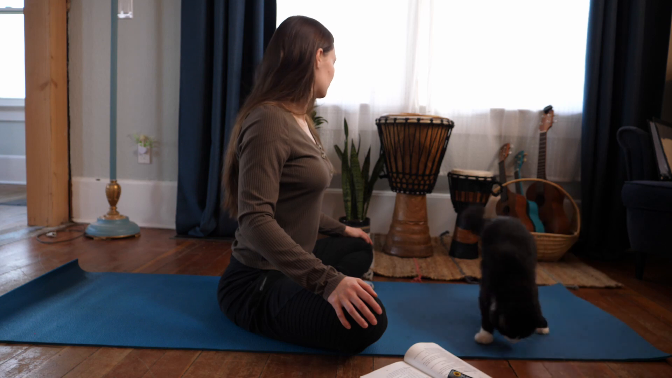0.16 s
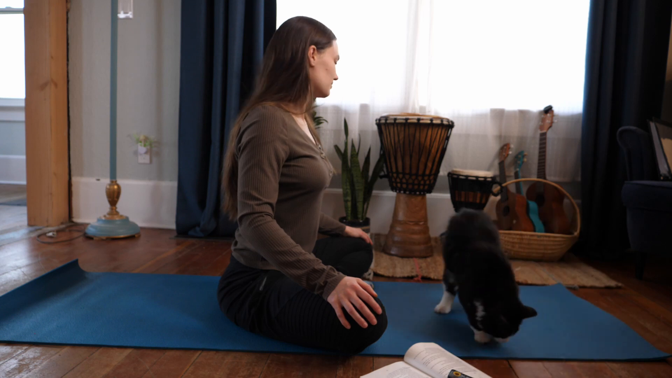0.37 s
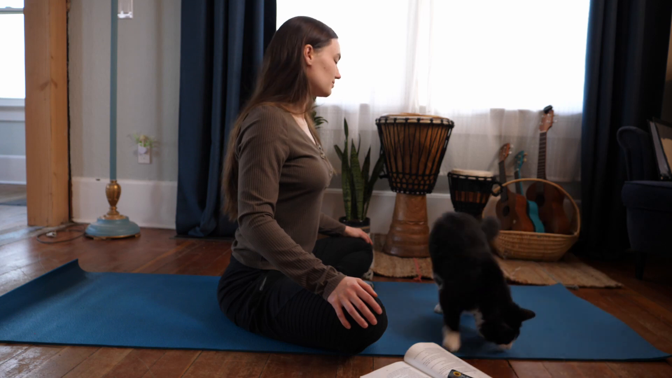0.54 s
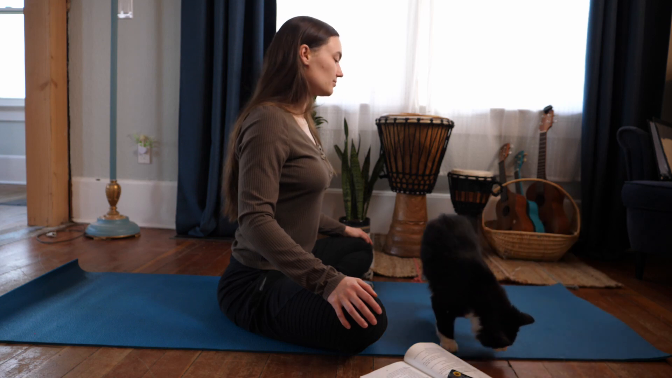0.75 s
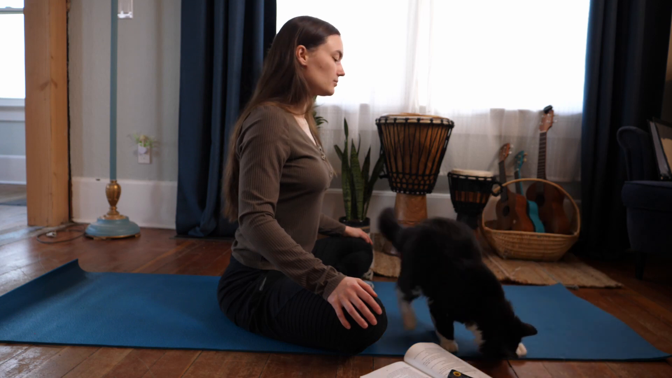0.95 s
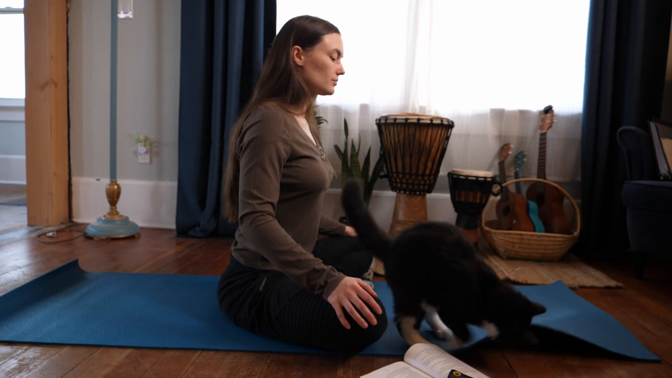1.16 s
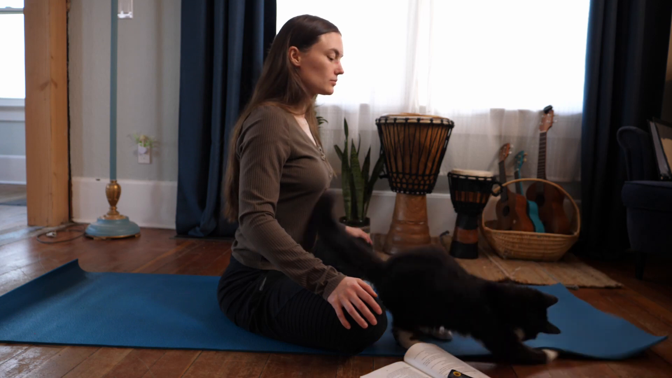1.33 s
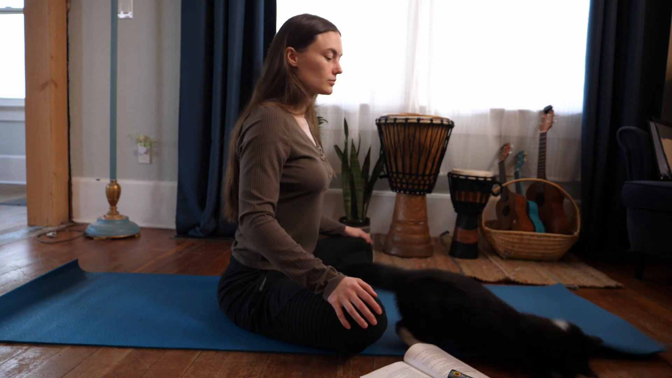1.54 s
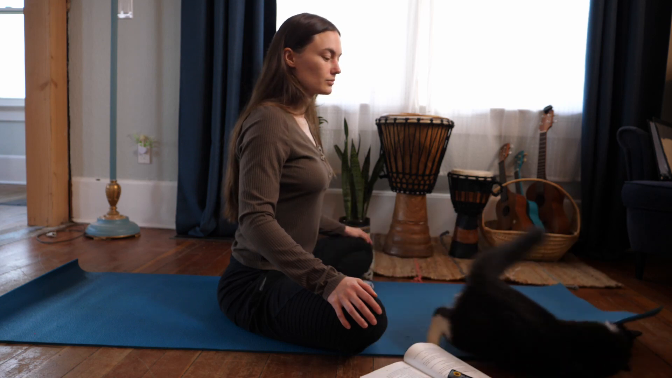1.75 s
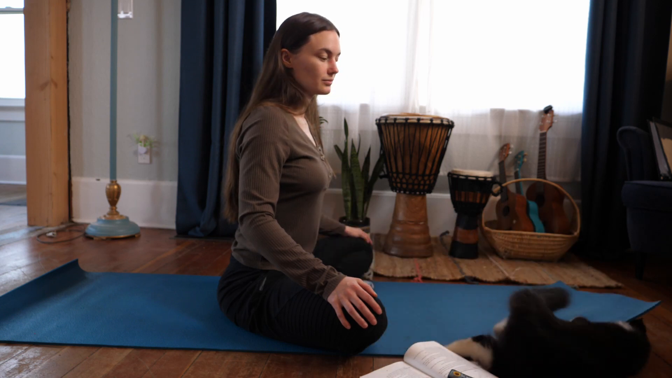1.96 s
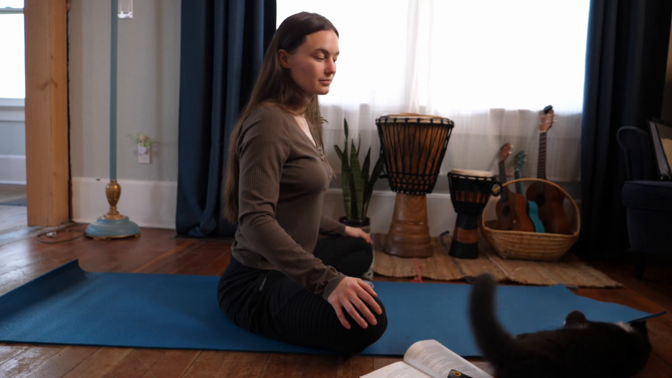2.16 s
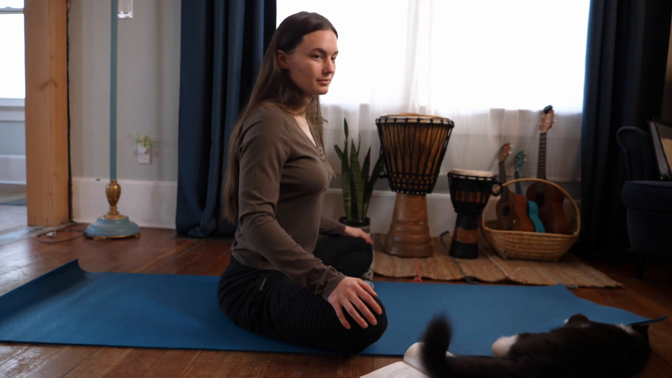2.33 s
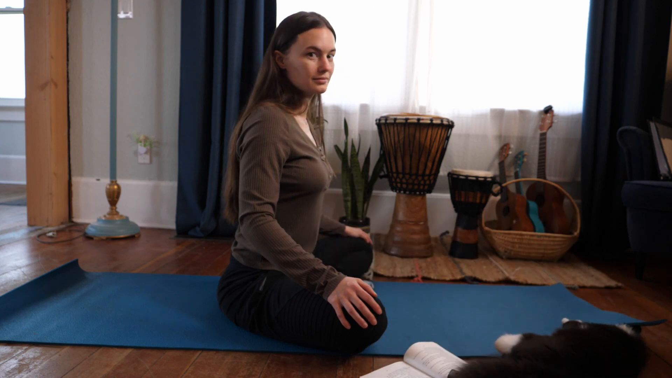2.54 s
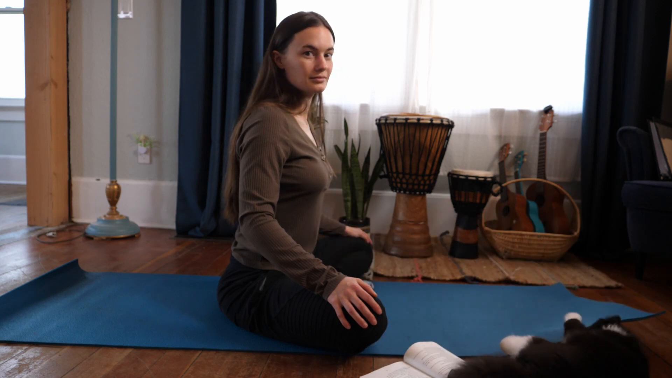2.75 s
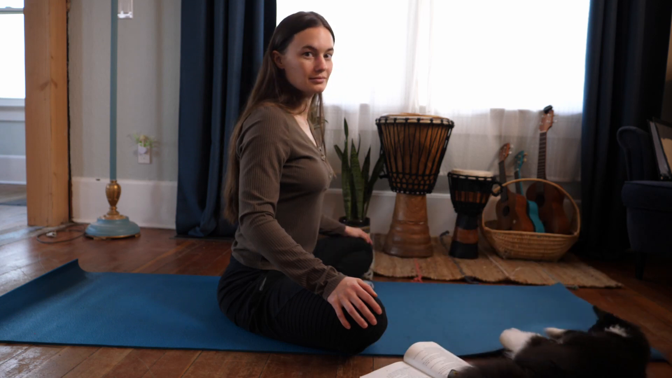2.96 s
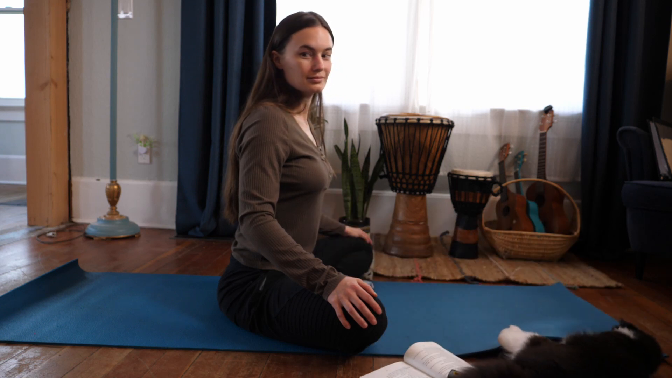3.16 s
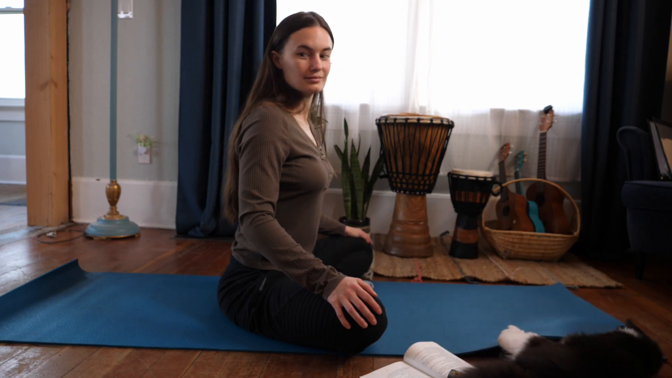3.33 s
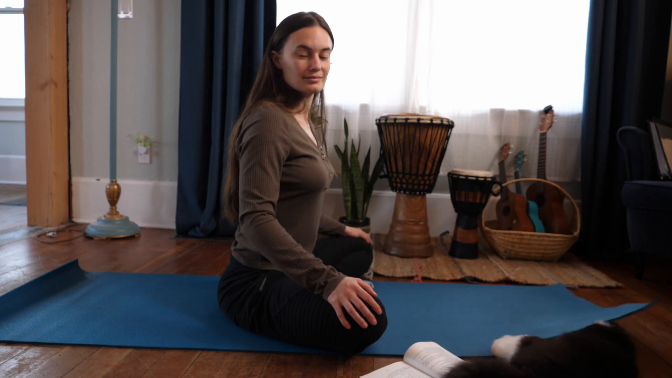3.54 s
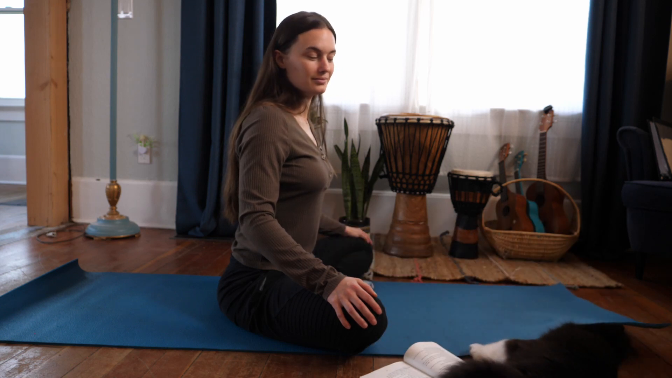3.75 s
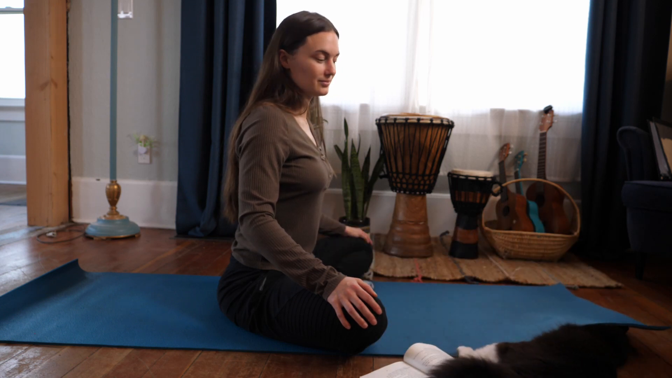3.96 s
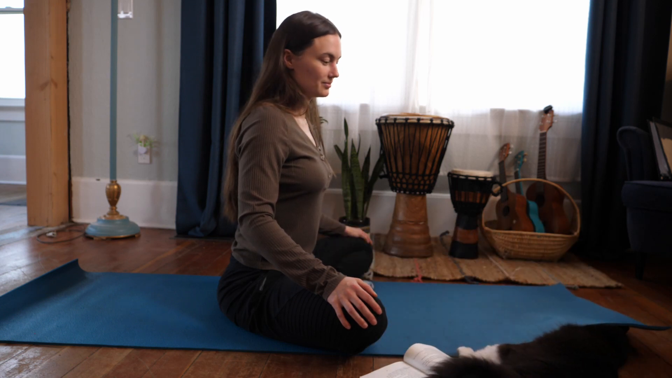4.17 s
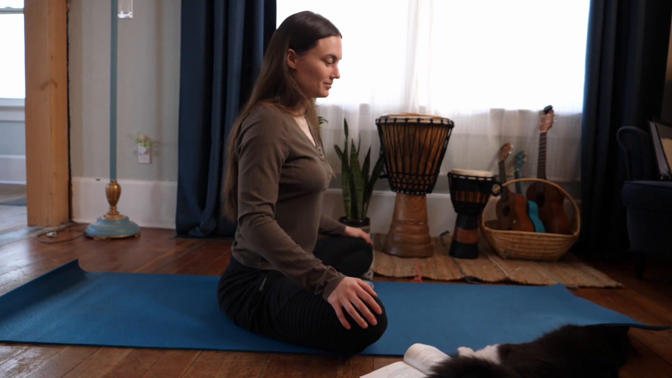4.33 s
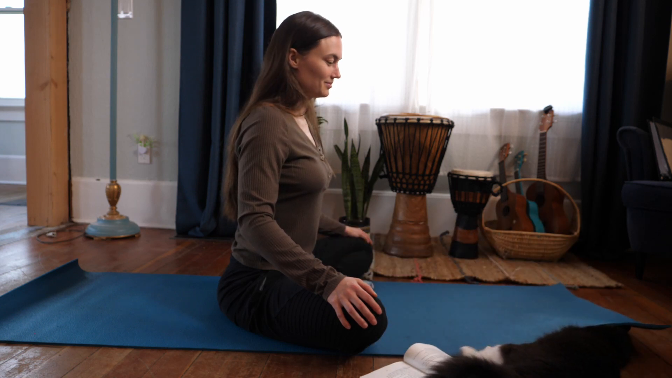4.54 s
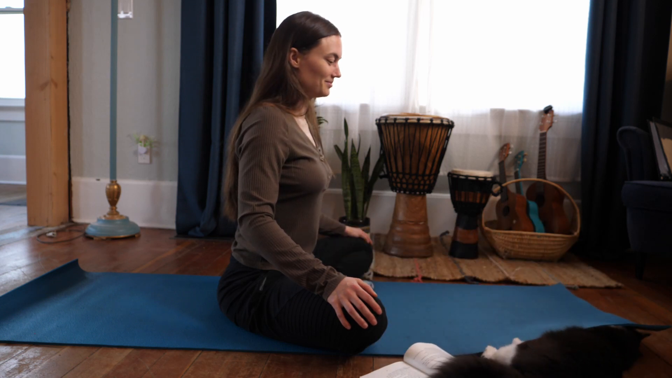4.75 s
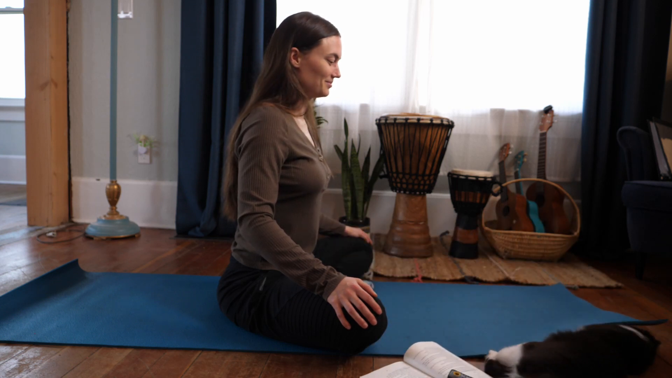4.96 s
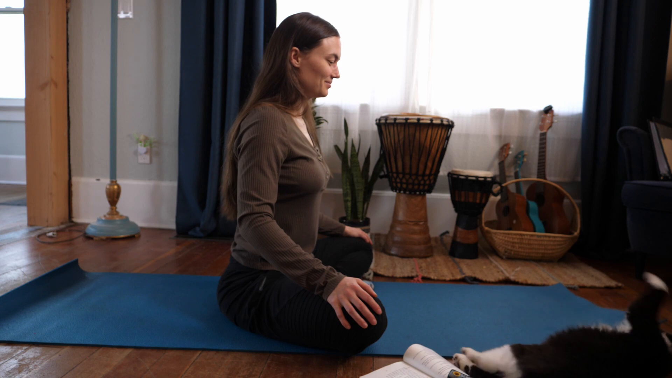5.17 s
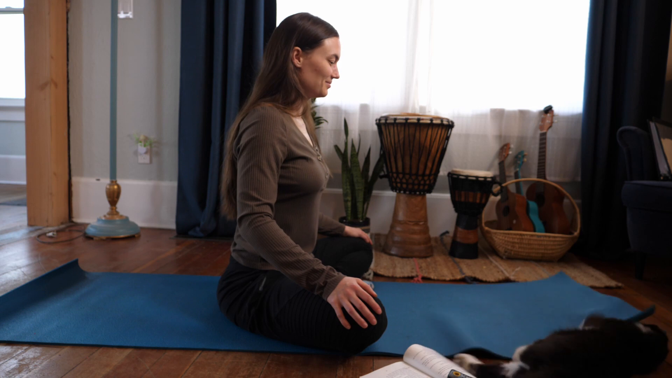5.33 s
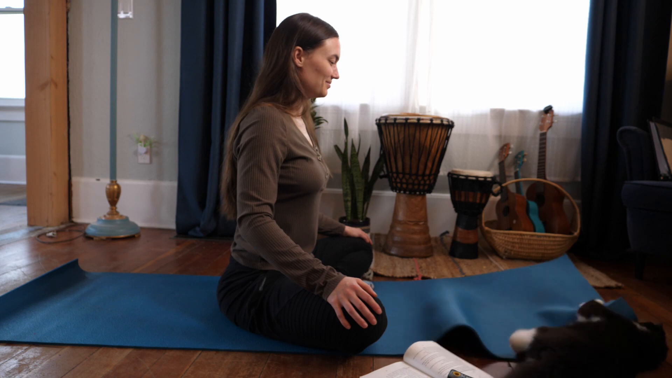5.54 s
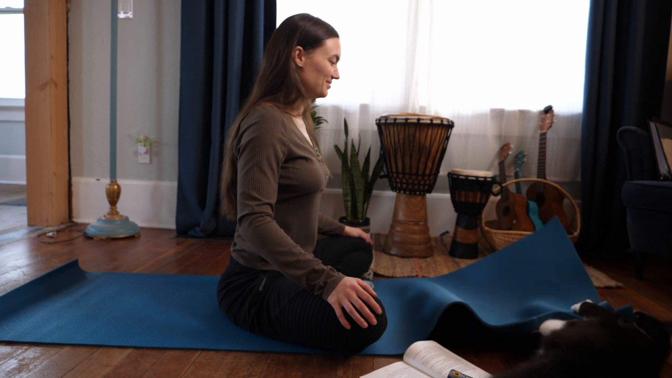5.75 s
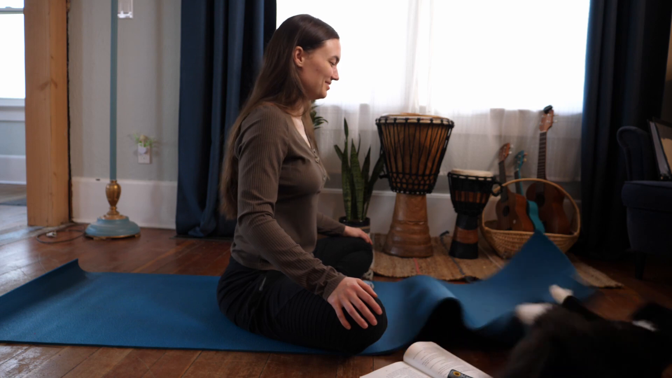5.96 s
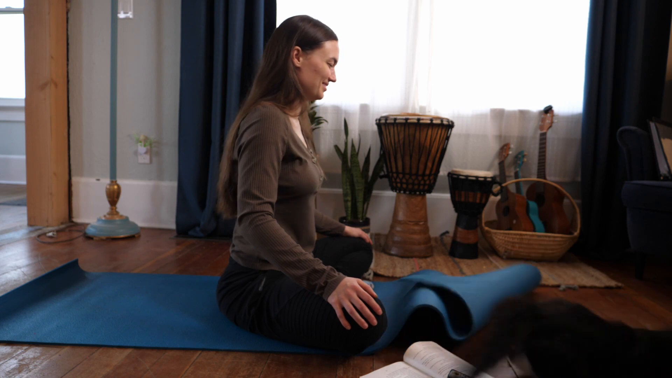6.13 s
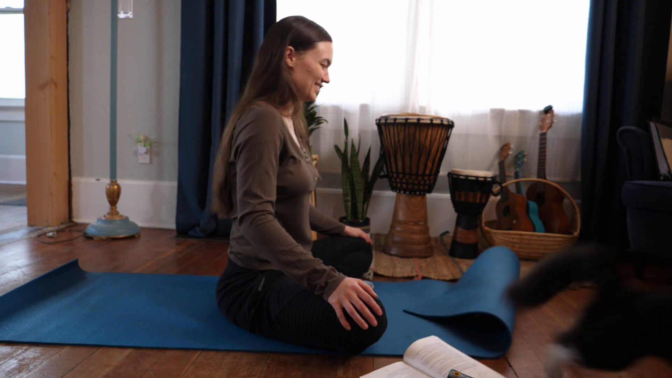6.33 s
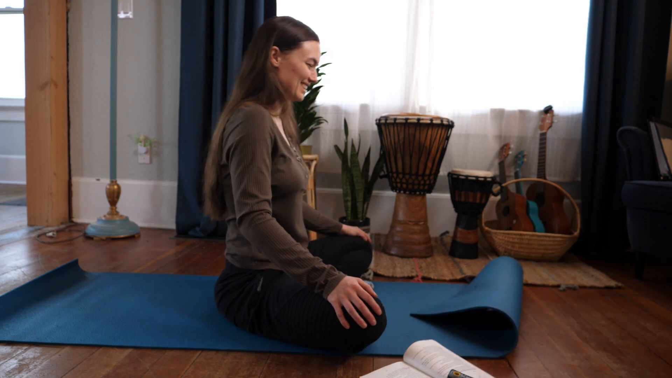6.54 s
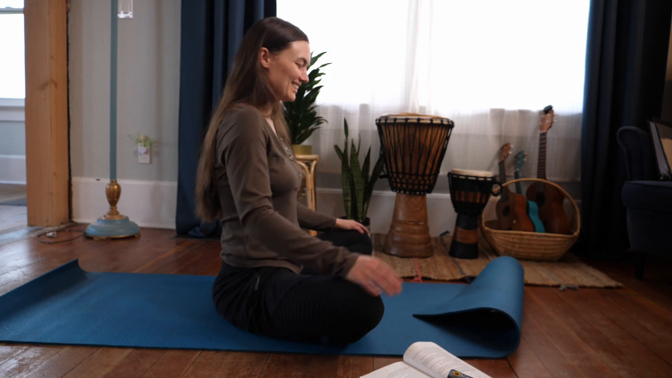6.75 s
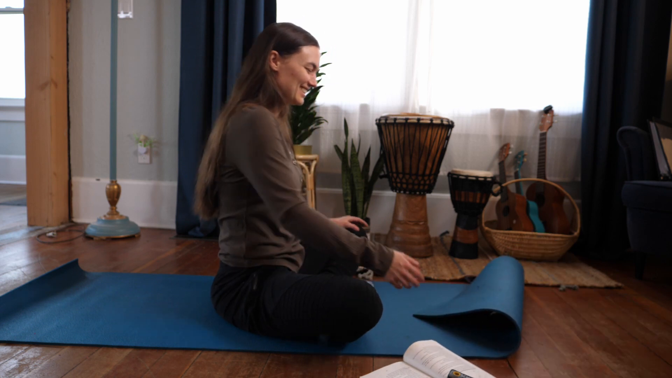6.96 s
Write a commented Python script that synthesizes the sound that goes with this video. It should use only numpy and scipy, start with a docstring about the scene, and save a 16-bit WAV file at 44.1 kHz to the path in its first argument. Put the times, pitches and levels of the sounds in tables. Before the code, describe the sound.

A soft, steady airy hush fills a living room. A cat's paws thud faintly on floorboards, then it lands on a foam-rubber mat with popping slaps, claw clicks and creasing. Small scratches taper into near quiet. Then kicks and tugs slap, rumple and drag the mat over the wood, strongest at the end. A brief cloth sweep and a few soft thuds close it. Nearby stereo microphone, short lively room reflections.

```python
"""A soft airy background is heard first, then faint paw scuffs and thuds on a wooden floor.
A cat pounces on a rubber exercise mat, claws it, then kicks and drags it into a fold; a hand brushes cloth.
Slaps, clicks, rasps and thuds are impulses or stick-slip showers through resonances and a live room's
response; sliding, rumpling, brushing and the background are coloured noise under level curves."""
import sys
import numpy as np
from scipy import signal
from scipy.fft import rfft, irfft, next_fast_len
from scipy.io import wavfile
from scipy.ndimage import map_coordinates

SR = 44100
rng = np.random.default_rng(int(sys.argv[2]) if len(sys.argv) > 2 else 0)


def dump(signal):
    """Clip the signal to [-1, 1] and save it as 16-bit WAV at the path in sys.argv[1]."""
    limited = np.clip(np.atleast_2d(signal).T, -1, 1)
    pcm = np.round(limited * 32767).astype(np.int16)
    wavfile.write(sys.argv[1], SR, pcm)


N = 312953
SIZE = 2 ** 15  # samples in one struck sound
T, HZ = np.arange(SIZE) / SR, np.fft.rfftfreq(SIZE, 1 / SR)

# spectrum of the creasing sheet: (frequency [Hz], spectral level [dB])
CREASE_COLOUR = [(300, -3), (800, 8.5), (1250, 11.5), (1850, 8.5), (2400, 2), (3100, -14.5), (6000, -55),
                 (15000, -84.5)]
# spectrum of the fizzing foam pores: (frequency [Hz], spectral level [dB])
FIZZ_COLOUR = [(2000, -36), (6000, -1), (8600, -10), (10600, -6), (12500, -16.5), (14500, -23.5),
               (16000, -5)]


def amp(db):
    """Level to amplitude: 20 dB is a factor of ten."""
    return 10 ** (np.asarray(db) / 20)


def unit(x):
    """Power normalisation: the mean square becomes 1."""
    return x / np.sqrt(np.mean(x ** 2) + 1e-20)


def along(points, hz):
    """Interpolation of (frequency, value) points on a logarithmic frequency axis."""
    f, v = np.transpose(points)
    return np.interp(np.log(hz + 1), np.log(f + 1), v)


def wobble(rate):
    """Band-limited fluctuation: a smooth curve through random knots, rate of them a second."""
    knots = rng.standard_normal(int(N * rate / SR) + 4)
    return map_coordinates(knots, [np.arange(N) * rate / SR])


def filtered(x, response):
    """Linear filtering: the spectrum of x is multiplied by a response of frequency."""
    m = next_fast_len(x.shape[-1] + SIZE)
    spectrum = rfft(x, m) * response(np.fft.rfftfreq(m, 1 / SR))
    return irfft(spectrum, m)[..., :x.shape[-1]]


def stereo(pair, side_db):
    """Interaural coherence: mid and side combine so that left and right are most alike near 150 Hz."""
    # diffuse width, before the side_db trim: (frequency [Hz], side minus mid [dB])
    side_levels = [(30, -4), (70, -15), (150, -32.5), (300, -25), (550, -17.5), (1100, -10), (2200, -6.5),
                   (4500, -8.5), (8000, -8.5), (12000, -5.5)]
    side = filtered(pair[1], lambda hz: amp(along(side_levels, hz) + side_db))
    return np.array([pair[0] + side, pair[0] - side])


def rush(colour, grain_db, side_db):
    """Friction noise: coloured stereo noise of rms 1 whose strength varies from grain to grain."""
    pair = rng.standard_normal((2, N)) * amp(grain_db * wobble(350))
    coloured = filtered(pair, lambda hz: amp(along(colour, hz)))
    return unit(stereo(coloured, side_db))


def smooth(colour):
    """Stationary noise: even stereo noise with no grain."""
    return rush(colour, grain_db=0, side_db=2.5)


def stroke(start, length, attack, fall_db_per_s):
    """Friction envelope: gain builds up, holds until length has passed, then decays exponentially."""
    t = np.arange(N) / SR - start
    return np.clip(t / attack, 0, 1) * amp(-fall_db_per_s * np.maximum(t - length, 0))


def causal(colour):
    """Minimum phase: a struck body with this spectrum makes no sound before the blow."""
    cepstrum = irfft(np.log(amp(along(colour, HZ))))
    return np.exp(rfft(2 * cepstrum * (np.arange(SIZE) < SIZE // 2)))


def resonance(hz, q):
    """Damped resonance: a second-order band-pass, squared for steeper skirts."""
    return (1j * HZ * hz / q / (hz * hz - HZ * HZ + 1j * HZ * hz / q)) ** 2


def room(direct=0.62, tail_level=0.59, build=0.0013, side_db=1.0, early=1.0, early_life=0.021):
    """Room acoustics: direct sound, wall echoes and a diffuse tail with frequency-dependent decay."""
    # reverberation: (frequency [Hz], time to fall 60 dB [s])
    decay_times = [(100, 0.8), (300, 0.38), (1500, 0.62), (5000, 0.59), (14000, 0.12)]
    # early wall echoes: (nominal delay [s], gain relative to the direct sound)
    wall_echoes = [(.0034, 0.16), (0.0128, 0.45), (0.0145, 0.29), (.0182, .45), (.031, 0.31)]
    hz, t, z = signal.stft(rng.standard_normal((2, SIZE)), SR, nperseg=256)
    decay = amp(-60 * t / along(decay_times, hz)[:, None])
    tail = signal.istft(z * decay, SR, nperseg=256)[1][:, :SIZE]
    # nearby furniture thickens the start of the tail
    tail = tail * (1 - np.exp(-T / build)) * (1 + early * np.exp(-T / early_life))
    paths = tail_level * tail / np.linalg.norm(tail[0])
    for delay, gain in wall_echoes:
        arrival = int(delay * SR * rng.uniform(.94, 1.06))
        paths[:, arrival] += direct * gain * np.array([1, rng.normal(0, 0.524)])  # mid, side
    paths[0, 0] += direct
    return rfft(stereo(paths, side_db))


def slips(length, rate, first, uneven_db=4):
    """Stick-slip: a first catch, then a random shower of tiny jerks that swells and dies."""
    u = T / max(length, 1e-4)
    strong_or_weak = np.where(rng.random(SIZE) < rate / SR, 1, .05)
    jerks = rng.standard_normal(SIZE) * strong_or_weak * u * np.exp(-u)
    jerks *= amp(uneven_db * rng.standard_normal(SIZE))
    jerks /= np.linalg.norm(jerks)
    jerks[0] += first
    return rfft(jerks)


def add(out, s, parts, hold):
    """Superposition: (spectrum, dB) parts join at time s, each with that level's energy over hold seconds."""
    sound = sum(amp(db) * unit(irfft(spectrum)) for spectrum, db in parts)
    sound = sound * np.sqrt(hold * SR / SIZE)
    start = int(s * SR)
    out[:, start:start + SIZE] += sound[:, :N - start]


def slaps(q=1.65, firm=0.004):
    """Impact and cavity resonance: a pocket of air pops, the boards thud and the sheet creases."""
    # the mat slaps down or buckles: (time [s], level [dB], trapped-air pitch [Hz], shower time constant [s])
    slap_events = [(1.168, -29.5, 705, 0.0063), (1.233, -33.5, 730, 0.0027), (1.292, -35.5, 500, 0.0036),
                   (1.431, -29.5, 705, 0.0033), (1.443, -21.5, 1300, 0.0014), (1.613, -21, 834, 0.00066),
                   (1.625, -29.5, 910, 0.0006), (1.641, -27, 895, 0.0018), (1.696, -26, 735, 0.00079),
                   (1.893, -33, 626, 0.0012), (2.012, -33, 560, 0.0034), (2.553, -36, 815, 0.0033),
                   (2.803, -34.5, 525, 0.0067), (2.829, -36, 520, 0.0081), (3.260, -37, 895, 0.0081),
                   (3.466, -40.5, 506, .0046), (4.922, -39.5, 450, 0.003), (5.189, -25, 560, 0.0077),
                   (5.341, -16.5, 650, 0.00099), (5.356, -14.5, 633.5, 0.00055),
                   (5.603, -34.5, 400, 0.0044), (5.747, -21, 533, 0.0014), (6.031, -27, 546, 0.0052),
                   (6.052, -21.5, 460, 0.0013), (6.082, -18, 513, 0.0073), (6.109, -18.5, 424, 0.0041),
                   (6.181, -23.5, 336, 0.00092), (6.230, -16.5, 1200, .0003), (6.248, -18, 520, 0.013)]
    # spectrum of the boards: (frequency [Hz], spectral level [dB])
    board_colour = [(30, -46), (70, -35.5), (110, -2), (160, 5), (280, 14.5), (450, -17), (900, -41),
                    (3000, -95)]
    boards_db = -16  # relative to the slap
    # a smaller, higher pocket of air creases the sheet more loudly
    crease_db, crease_db_per_octave, pocket_hz = -18.5, 7.5, 550
    out, boards, sheet = np.zeros((2, N)), causal(board_colour), causal(CREASE_COLOUR)
    for s, db, hz, spread in slap_events:
        # the briefer the contact, the more of it lands in the first catch
        contact = slips(spread, rate=770, first=firm / spread)
        blow = room(direct=0.77, tail_level=0.98, build=0.0013) * contact
        crease = crease_db + crease_db_per_octave * np.log2(hz / pocket_hz)
        air_part = (blow * resonance(hz, q), db)
        board_part = (blow * boards, db + boards_db)
        sheet_part = (blow * sheet, db + crease)
        add(out, s, [air_part, board_part, sheet_part], hold=0.01)
    return out


def ticks(close=1.12):
    """Sudden release: sharp clicks, each a tiny crackle with a strong direct sound."""
    # a claw pops free or the mat's edge cracks on the boards:
    # (time [s], level [dB], crack relative to the level [dB])
    tick_events = [(1.169, -42.5, 8), (1.230, -34.5, 5), (1.464, -37, 2), (1.477, -35, 6),
                   (1.637, -25.5, -16), (1.6965, -23.5, 1), (1.892, -27.5, -6), (1.911, -34.5, 3),
                   (1.932, -38, 4.5), (2.012, -36, -5), (2.556, -40, -3), (3.458, -40, -2),
                   (3.505, -34, -28.5), (3.638, -31, -10), (6.189, -22, 3), (6.212, -34, 12.5),
                   (6.22, -24.5, 8.5), (6.2295, -17.5, 9)]
    # spectrum of the snapping skin: (frequency [Hz], spectral level [dB])
    snap_colour = [(60, -42), (600, -6.5), (2200, 10), (3100, -3), (4300, 2), (6500, 0), (8600, -10),
                   (10500, -10), (13500, -18.5), (16000, -46)]
    fizz_db = -38.5  # the foam fizzes equally at every click, however hard
    out, skin = np.zeros((2, N)), causal(snap_colour)
    sheet, pores = causal(CREASE_COLOUR), causal(FIZZ_COLOUR)
    for s, db, crack in tick_events:
        crackle = slips(.0004, rate=25000, first=.3)
        # the crackle comes direct; the room adds its own impulse response
        click = close * crackle + room(direct=0.38, tail_level=0.93, build=0.0025, side_db=2.5)
        add(out, s, [(click * skin, db), (click * sheet, db + crack), (click * pores, fizz_db)], hold=0.0049)
    return out


def scratches(q=1.8):
    """Stick-slip friction: claws and pads catch and slip through the foam in short showers."""
    # claws rake the rubber: (time [s], level [dB], rasp pitch [Hz], tearing relative to the level [dB],
    # shower time constant [s])
    claw_events = [(1.432, -30.5, 2760, 8, 0.021), (1.642, -36, 3470, 6, .0088),
                   (1.692, -41, 5900, 16, 0.0082), (1.897, -47.5, 4700, -3, 0.0068),
                   (1.992, -37, 4070, 3, 0.0071), (2.229, -44, 2970, 2, 0.005),
                   (3.340, -41.5, 4550, 8.5, 0.005), (3.513, -39, 2600, 0, 0.024),
                   (3.585, -37.5, 4240, -5, 0.002), (3.631, -47.5, 4500, 8.5, 0.013),
                   (5.123, -34, 5060, -6, 0.0033), (5.601, -42.5, 3440, 12, .024),
                   (5.743, -39.5, 3300, 11.5, 0.0062), (6.083, -32.5, 3400, 16.5, 0.0045),
                   (6.19, -13, 1890, -12.5, .0008)]
    # paw pads scuff over the foam: (time [s], level [dB], shower time constant [s])
    pad_events = [(0.358, -52.5, 0.011), (1.292, -41.5, 0.0033), (2.079, -46, 0.013),
                  (2.543, -48.5, 0.0046), (3.452, -57, .006), (5.181, -35.5, 0.013), (6.072, -30, 0.01),
                  (6.197, -24, 0.026)]
    pad_hz, pad_tear_db = 4700, 3  # every scuff has the same rasp and relative tearing
    claw_fizz_db, pad_fizz_db = -17, 1  # a flat pad stirs the pores far more than a claw
    out, sheet, pores = np.zeros((2, N)), causal(CREASE_COLOUR), causal(FIZZ_COLOUR)
    claws = [(s, db, hz, tear, claw_fizz_db, length) for s, db, hz, tear, length in claw_events]
    pads = [(s, db, pad_hz, pad_tear_db, pad_fizz_db, length) for s, db, length in pad_events]
    for s, db, hz, tear, fizz, length in claws + pads:
        rake = room(direct=0.93, tail_level=1.0, build=0.0021) * slips(length, rate=700, first=0.32)
        rasp_part = (rake * resonance(hz, q), db)
        add(out, s, [rasp_part, (rake * sheet, db + tear), (rake * pores, db + fizz)], hold=0.0076)
    return out


def thuds(q=1.96):
    """Damped modal response: padded weight rings the floorboards for a few cycles."""
    # soft weight lands on the boards: (time [s], level [dB], pitch [Hz])
    thud_events = [(0.384, -49.5, 146), (0.656, -49, 140), (0.933, -52, 243), (1.798, -43, 164.4),
                   (2.022, -38.5, 295), (2.829, -50, 173), (6.109, -35, 200), (6.186, -29, 225),
                   (6.232, -29, 177), (6.262, -35.5, 285), (6.542, -46.5, 196.4), (6.733, -38, 240),
                   (6.776, -46, 160), (6.897, -48, 226), (7.012, -55, 175.6)]
    out = np.zeros((2, N))
    for s, db, hz in thud_events:
        thud = room(direct=0.92, tail_level=0.97) * resonance(hz, q)
        add(out, s, [(thud, db)], hold=0.042)
    return out


def sing(x, share_db=-4):
    """Selective resonance: the taut sheet favours a few narrow bands of the hiss."""
    # sheet resonances, before the share_db trim: (frequency [Hz], width [Hz], level [dB])
    sheet_modes = [(2250, 33, 2), (2610, 110, -4), (4100, 250, -1), (4680, 88, -27), (6170, 120, -11),
                   (7140, 140, 0)]

    def bands(hz):
        return sum(amp(db) / (1 + (2 * (hz - centre) / width) ** 2) for centre, width, db in sheet_modes)

    return unit(filtered(x, lambda hz: 1 + amp(share_db) * bands(hz)))


def drag(slide_db=0, rumple_db=-2):
    """Sliding friction: with each tug the rubber hisses over the boards while its folds rumble."""
    # the cat tugs the mat, before the common trims:
    # (start [s], length before the fall [s], sliding level [dB], rumpling level [dB])
    tugs = [(1.154, 0.19, -53.5, -44.5), (1.472, .33, -55, -45), (1.89, 0.15, -65, -45),
            (3.34, 0.47, -58.5, -51), (3.79, 0.21, -63.5, -58.5), (4.645, 0.18, -61, -63),
            (4.741, 0.073, -50, -86), (4.881, 0.028, -46.5, -45), (5.1, 0.12, -43, -43),
            (5.38, 0.16, -49, -37.5), (5.59, 0.027, -40.5, -33), (5.737, 0.02, -44.5, -32.5),
            (5.804, 0.18, -41.5, -80), (6.002, 0.28, -38.5, -31)]
    # spectrum of the sliding rubber: (frequency [Hz], spectral level [dB])
    slide_colour = [(300, -45), (900, -6.5), (1600, 10.5), (2400, 8), (3100, 4.5), (4500, 4.5), (6500, 1),
                    (8600, -6), (10500, 0.5), (13000, -12.5), (16000, -17)]
    # spectrum of the rumpling folds: (frequency [Hz], spectral level [dB])
    rumple_colour = [(50, -53), (150, -4), (330, 3.5), (580, 1.5), (800, 3), (1300, -14.5), (2500, -71),
                     (6000, -59)]
    attack_s, slide_fall_db_per_s, rumple_fall_db_per_s = 0.055, 74, 74
    slide_strokes = [amp(db) * stroke(s, length, attack_s, slide_fall_db_per_s) for s, length, db, _ in tugs]
    rumple_strokes = [amp(db) * stroke(s, length, attack_s, rumple_fall_db_per_s) for s, length, _, db in tugs]
    # overlapping tugs add in power
    sliding = np.linalg.norm(slide_strokes, axis=0)
    rumpling = np.linalg.norm(rumple_strokes, axis=0)
    rubber = sing(rush(slide_colour, grain_db=1.0, side_db=0.0))
    folds = rush(rumple_colour, grain_db=1.5, side_db=2.5)
    hiss = amp(slide_db + 2.5 * wobble(30)) * sliding * rubber
    rumble = amp(rumple_db + 0.93 * wobble(34)) * rumpling * folds
    return hiss + rumble


def brush():
    """Fibre friction: a hand sweeps over cloth as one stroke of coloured noise."""
    # the sweep: (start [s], length before the fall [s], level [dB])
    sweep = (6.62, 0.095, -38.5)
    # spectrum of the cloth: (frequency [Hz], spectral level [dB])
    cloth_colour = [(470, -64), (800, -37), (940, -18), (1240, -8.5), (1560, -13), (2360, -8), (2570, -15),
                    (3820, -9.5), (4330, -5), (6060, -8.5), (9010, -18), (10700, -15), (15600, -34)]
    start, length, db = sweep
    gain = amp(db) * stroke(start, length, attack=0.047, fall_db_per_s=115)
    return gain * rush(cloth_colour, grain_db=-1.0, side_db=1)


def boom(hz, dip_hz=715, dip_width_hz=110, dip_db=-7):
    """Modes and interference: low resonances ring on; a floor bounce weakens a narrow band."""
    # low notes the floor and room favour: (frequency [Hz], width [Hz], level [dB])
    low_modes = [(147, 53, -7.5), (243.3, 11, -1), (340, 27, -2), (413, 34, -4.5), (521, 100, -7.5),
                 (616, 7.5, -1.5), (920, 17, -21.5)]

    def peak(centre, width):
        return 1j * hz * width / (centre ** 2 - hz ** 2 + 1j * hz * width)

    ringing = 1 + sum(amp(db) * peak(centre, width) for centre, width, db in low_modes)
    return ringing * (1 - amp(dip_db) * peak(dip_hz, dip_width_hz))


def background(steady_db=-55, whir_db=-1):
    """Stationary noise: steady room noise and hiss, with a soft airy band that drifts in level."""
    # airy band, before the whir_db trim: (time [s], level [dB])
    air_levels = [(0, -53), (1.2, -54.5), (2.2, -58.5), (2.7, -54.5), (3.3, -52.5), (4.5, -54), (5.2, -51),
                  (6.3, -51.5), (7.1, -63)]
    # spectrum of the airy band: (frequency [Hz], spectral level [dB])
    air_colour = [(300, -14.5), (650, -4), (850, 1.5), (1020, -3.5), (1300, -0.5), (1700, -11), (2600, -18),
                  (6000, -60)]
    # spectrum of the steady noise, before the room's modes: (frequency [Hz], spectral level [dB])
    quiet_colour = [(25, -48), (50, -52.5), (95, -7.5), (155, 0.5), (260, -3), (420, -8.5), (650, -14.5),
                    (1400, -28.5), (2200, -25.5), (3100, -26), (4300, -22), (7500, -26.5), (13000, -28),
                    (16000, -45.5)]
    air_db = np.interp(np.arange(N) / SR, *np.transpose(air_levels))
    air = amp(whir_db + air_db) * smooth(air_colour)
    steady = amp(steady_db) * unit(filtered(smooth(quiet_colour), boom))
    return air + steady


def scene():
    """Interaural level difference: most of the scuffle's spectrum leans a little to the right."""
    # placing of the cat: (frequency [Hz], left minus right [dB])
    lean = [(200, 0.5), (550, -0.1), (1100, -1), (2200, -1.5), (4500, -0.5), (12000, 0)]
    scuffle = slaps() + ticks() + scratches() + thuds() + drag()
    placed = filtered(scuffle, lambda hz: boom(hz) * amp(np.outer([.5, -.5], along(lean, hz))))
    return placed + brush() + background()


def record(dry):
    """Band limiting: a high-pass halves the amplitude at 45 Hz; nothing remains from the top limit up."""
    top_hz = 15500
    return filtered(dry, lambda hz: hz ** 4 / (hz ** 4 + 45 ** 4) * (hz < top_hz))


dry = scene()
out = record(dry)
dump(out)
```